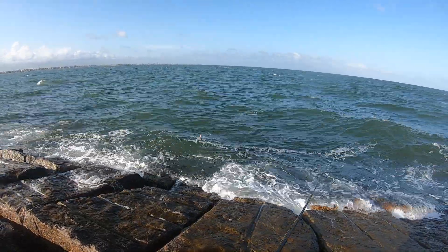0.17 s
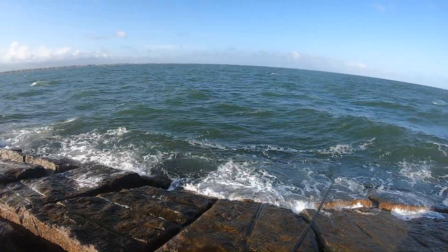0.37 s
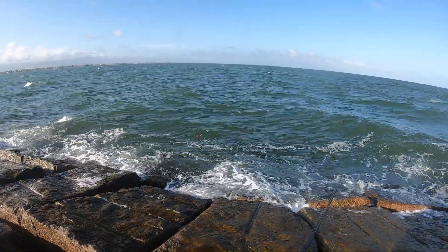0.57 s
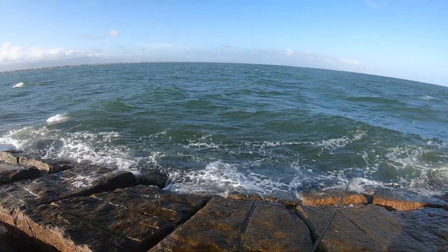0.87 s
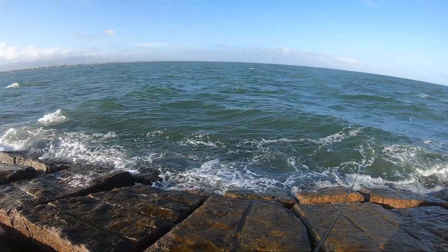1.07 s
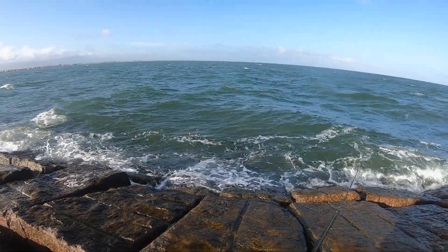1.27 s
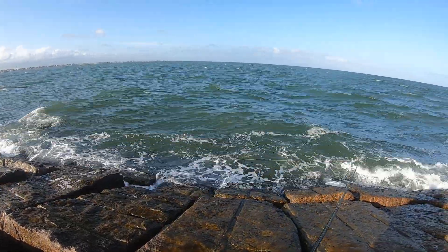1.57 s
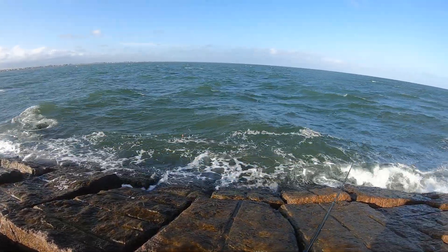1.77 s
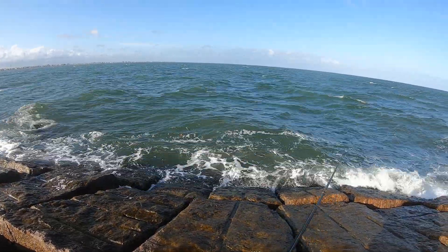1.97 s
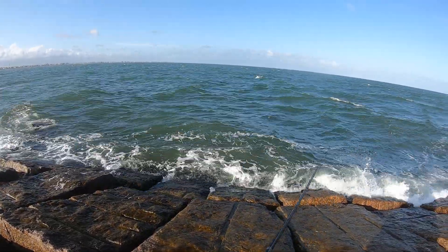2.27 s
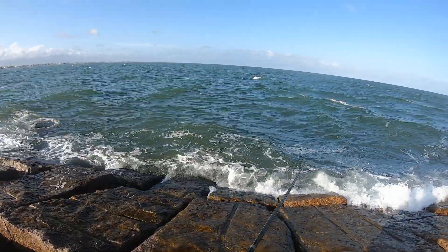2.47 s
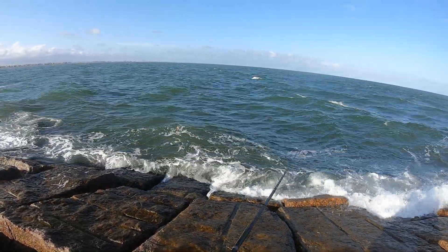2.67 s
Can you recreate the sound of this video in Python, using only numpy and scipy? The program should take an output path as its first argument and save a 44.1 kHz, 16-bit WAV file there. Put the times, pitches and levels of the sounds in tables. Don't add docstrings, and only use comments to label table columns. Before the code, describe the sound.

Surf roars and hisses along a stone jetty, with water slaps, glugs and heavy wind buffeting

```python
import sys
import numpy as np
from scipy import signal
from scipy.fft import rfft, irfft, next_fast_len
from scipy.io import wavfile
from scipy.ndimage import uniform_filter1d, map_coordinates

SR = 44100
rng = np.random.default_rng(int(sys.argv[2]) if len(sys.argv) > 2 else 0)


def unload_audio(sound):
    columns = np.transpose(np.atleast_2d(sound))
    steps = np.round(np.clip(columns, -1, 1) * 32767)
    wavfile.write(sys.argv[1], SR, steps.astype(np.int16))


def invert_db(x):
    u = np.asarray(x, float) / 20
    return 10 ** u


N = 123479


def unit(x):
    return x / np.sqrt(np.mean(x ** 2) + 1e-20)


def curve(rows):
    s, value = np.transpose(rows)
    return np.interp(np.arange(N) / SR, s, value)


def wobble(rate):
    return map_coordinates(rng.standard_normal(999), [np.arange(N) * rate / SR])


def bumps(rows):
    t = np.arange(N) / SR
    return invert_db(sum(db * np.exp(-((t - s) / (length / 2)) ** 2) for s, db, length in rows))


def coloured(x, spectrum):
    size = next_fast_len(N + 8192)
    hz, db = np.transpose(spectrum)
    bins_hz = np.fft.rfftfreq(size, 1 / SR)
    gain = invert_db(np.interp(np.log(bins_hz + 1), np.log(hz + 1), db, left=-120))
    return unit(irfft(rfft(x, size) * gain, size)[:N])


def patchy(depth_db):
    z = signal.stft(rng.standard_normal(N + 512), nperseg=512)[2]
    field = uniform_filter1d(rng.standard_normal(z.shape), size=9, axis=0)
    field = uniform_filter1d(field, size=8, axis=1)
    return signal.istft(z * invert_db(depth_db * unit(field)), nperseg=512)[1][:N]


def grains(count, hz, spread, cycles, scatter_db, size):
    u = rng.random((count, 2))
    pitch_hz = np.clip(hz * np.exp(spread * rng.standard_normal(count)), 100, 15000)[:, None]
    turn = pitch_hz * np.arange(size) / SR
    wave = np.sin(2 * np.pi * turn * (1 + 0.14 * turn / cycles))
    wave = wave * np.exp(-3 * turn / cycles) * (1 - np.exp(-2 * turn))
    wave = wave * invert_db(-scatter_db * np.log(u[:, 1:] + 1 / 20))
    where = (u[:, :1] * N).astype(int) + np.arange(size)
    return unit(np.bincount(where.ravel(), wave.ravel(), N + size)[:N])


def foam(spectrum, fizz, crackle):
    small = grains(count=9000, hz=3494, spread=0.737, cycles=6.4, scatter_db=3.0, size=150)
    sharp = grains(count=3000, hz=7150, spread=0.51, cycles=1.4, scatter_db=5.5, size=40)
    mix = patchy(depth_db=0.8) + fizz * small + crackle * sharp
    return invert_db(0.6 * wobble(19)) * coloured(mix, spectrum)


def breaker():
    # start_s, level_db
    strength = [(0, -49), (.5, -50.5), (.85, -49), (1.07, -47), (1.4, -42.5), (1.75, -45), (1.96, -42.5),
                (2.25, -52), (2.5, -47), (2.8, -53)]
    # pitch_hz, density_db (per Hz)
    foam_colour = [(700, -29), (1300, -11), (1900, -4.5), (3000, -3.5), (5000, -10), (8000, -19),
                   (13000, -24.5), (16000, -30)]
    # pitch_hz, gain_db
    copy_colour = [(1, 0), (3000, 0), (4500, -5), (6500, -4), (8000, 3), (22050, 3)]
    # start_s, lag_ms
    copy_lag = [(0, .535), (1.1, .527), (1.75, .548), (2.3, .537), (2.8, .555)]
    copy_share = 0.7
    direct = foam(foam_colour, fizz=0.42, crackle=0.1)
    copy = np.std(direct) * coloured(direct, copy_colour)
    heard_at = np.arange(N) - curve(copy_lag) * SR / 1000
    late = map_coordinates(copy, [heard_at], order=5, mode="nearest")
    return invert_db(curve(strength)) * unit(direct + copy_share * late)


def wash():
    # start_s, level_db
    strength = [(0, -45), (.35, -45), (.5, -46.5), (.9, -45.5), (1.05, -44.5), (1.3, -43.5), (1.8, -43),
                (2.1, -41), (2.4, -39.5), (2.55, -39), (2.8, -38)]
    # pitch_hz, density_db (per Hz)
    spray_colour = [(600, 0.5), (1300, -10), (1900, -5.5), (2700, -10.5), (4000, -8), (7000, -15),
                    (12000, -23), (16000, -30)]
    return invert_db(curve(strength)) * foam(spray_colour, fizz=0.33, crackle=0.27)


def surges():
    surge_bumps = [(.33, 0.5, .06), (0.832, 1, .04), (1.065, 3.5, .04), (1.25, 1.5, 0.034),
                   (1.343, 2, 0.031), (1.45, 2, 0.047), (1.58, 2, 0.044), (1.965, 2, 0.038),
                   (2.02, -2.5, 0.024), (2.268, -2.5, 0.028), (2.416, 2.5, 0.048), (2.73, 1, .05)]
    return bumps(surge_bumps)


def slaps():
    # start_s, peak_db, pitch_hz (of the trapped air)
    hits = [
        (.4824, -11.5, 640),
        (1.072, -25, 690),
        (1.995, -22, 580),
        (2.254, -25, 550),
    ]
    # pitch_ratio (over the lowest mode), level_db, ring_ratio (over t60_s)
    modes = [(1, 0, .9), (1.6, -3, .6), (2.4, -7, 2), (3.2, -17, .8)]
    t60_s, level_db, splash_db = 0.04, -2, -14
    out, t = np.zeros(N + SR), np.arange(SR // 8) / SR
    onset = 1 - np.exp(-t / 0.00057)
    for s, db, hz in hits:
        ring = sum(invert_db(mode_db - 60 * t / (t60_s * lasts)) * np.sin(2 * np.pi * hz * ratio * t)
                   for ratio, mode_db, lasts in modes)
        dull_noise = np.convolve(rng.standard_normal(len(t)), np.hanning(18) / 6, "same")
        splash = invert_db(splash_db - 60 * t / t60_s) * dull_noise
        out[round(s * SR):][:len(t)] += invert_db(db + level_db) * onset * (ring + splash) / 2
    return out[:N]


def pockets():
    # start_s, level_db, pitch_hz, length_s
    glugs = [(.91, -26.5, 195, 0.045), (1.1, -27.5, 295, 0.048), (1.2, -32, 335, .035),
             (.915, -31, 560, .05), (1.243, -24, 140.5, 0.038), (1.362, -27.5, 277, 0.04),
             (.44, -35, 172, 0.043), (0.56, -27, 180, 0.027), (0.378, -34, 520, 0.042),
             (1.5, -31.5, 170, .035), (1.955, -33, 180, 0.03), (2.065, -31, 154, .035),
             (2.14, -29, 350, 0.032), (1.5, -33, 150, .03), (2.398, -29, 420, 0.034),
             (1.903, -25, 100, 0.052), (2.652, -23, 101, 0.041)]
    # start_s, level_db, pitch_hz, length_s
    flecks = [(1.235, -40, 2000, .03), (1.555, -42, 1800, .035), (2.035, -39, 1900, .025),
              (2.715, -40, 2000, .03)]
    out, t = np.zeros(N + SR), np.arange(SR // 8) / SR
    for s, db, hz, length in [*glugs, *flecks]:
        swell = np.sin(np.pi * np.clip(t / length, 0, 1)) ** 2
        tone = np.sin(2 * np.pi * hz * t * (1 + 0.017 * t / length))
        out[round(s * SR):][:len(t)] += invert_db(db) * swell * tone
    return out[:N]


def drops():
    # start_s, level_db
    ticks = [(.386, -37), (1.075, -33), (1.992, -35), (2.253, -30), (2.408, -26), (2.453, -31)]
    t60_s = 0.014
    out, t = np.zeros(N + SR), np.arange(SR // 20) / SR
    envelope = invert_db(-60 * t / t60_s) * (1 - np.exp(-t / 0.001))
    for s, db in ticks:
        bright_noise = np.gradient(rng.standard_normal(len(t)))
        out[round(s * SR):][:len(t)] += invert_db(db) * envelope * bright_noise
    return uniform_filter1d(out[:N], size=3)


def shore():
    # start_s, level_db
    roar_level = [(0.0, -35.5), (0.18, -33.5), (0.3, -34), (0.33, -32), (0.89, -33), (0.94, -31),
                  (1.23, -31.5), (1.35, -31), (1.84, -33.5), (1.99, -29.5), (2.0, -32.5), (2.22, -30.5),
                  (2.73, -30), (2.8, -31.5)]
    # pitch_hz, density_db (per Hz)
    roar_colour = [(60, -53), (150, -6.5), (300, -2.5), (650, -3.5), (1000, -9.5), (1400, -11.5),
                   (3000, -25), (8000, -49.5)]
    # start_s (centre), gain_db, length_s
    swells = [(.12, 0.5, 0.032), (.47, -2.5, .03), (.6, -2.5, .04), (.86, -1.5, 0.049), (.97, -1, 0.062),
              (1.12, -0.5, 0.037), (1.2, -1, 0.044), (1.37, -0.5, 0.068), (1.52, -3, .04), (1.8, -1, 0.034),
              (2.0, 0.5, 0.035), (2.16, 2.5, 0.029), (2.33, 0.5, 0.044), (2.43, 1, 0.03),
              (2.68, 1.5, 0.036)]
    bubbles = grains(count=1800, hz=457, spread=0.568, cycles=9.4, scatter_db=2.0, size=1500)
    level = invert_db(curve(roar_level) + 0.2 * wobble(14))
    roar = coloured(patchy(depth_db=0.6), roar_colour)
    return level * bumps(swells) * unit(roar + 0.42 * bubbles)


def evened(x, span_s):
    evenness = 0.7
    power = uniform_filter1d(x ** 2, size=round(span_s * SR))
    power = uniform_filter1d(power, size=round(span_s * SR / 2))
    return unit(x / (np.abs(power) + 0.22) ** (evenness / 2))


def wind():
    # start_s, level_db
    push_level = [(0.0, -32.5), (0.1, -27), (0.3, -23), (0.4, -15), (0.6, -21.5), (1.0, -17.5),
                  (1.3, -21.5), (1.55, -19), (1.68, -22), (1.85, -20.5), (2.2, -22), (2.42, -25.5),
                  (2.5, -14), (2.65, -20), (2.8, -21.5)]
    # pitch_hz, density_db (per Hz)
    push_colour = [(1.8, -32), (3, -3), (16, 0), (30, 0), (45, -4), (62, -14), (90, -40), (200, -120)]
    # start_s (centre), gain_db, length_s
    buffets = [(.08, -1, .04), (.14, 5.5, .05), (.22, -6, 0.045), (.32, -6, 0.032), (.44, -4, .04),
               (.54, 4, .06), (.67, 5.5, .045), (.72, -6, 0.035), (.76, 6, 0.029), (.84, -10, 0.043),
               (.88, 3.5, 0.031), (.99, -8, 0.053), (1.08, 8.5, 0.029), (1.14, 0.5, 0.056), (1.2, 3, 0.023),
               (1.33, -4, 0.046), (1.44, -7, .03), (1.48, 3.5, 0.039), (1.52, -5, 0.034), (1.56, 5, 0.05),
               (1.64, 3.5, 0.028), (1.72, -4, 0.044), (1.84, 6.5, .04), (1.92, 1, 0.026), (1.96, -3, .03),
               (2.0, 0, .04), (2.04, -6, 0.033), (2.16, 2.5, .04), (2.26, 0.5, .06), (2.32, 5, 0.027),
               (2.36, 7, 0.051), (2.49, 2.5, 0.062), (2.565, 1, 0.027), (2.68, 3, .03)]
    # start_s, level_db
    flutter_level = [(0, -39), (.2, -34.5), (.9, -32), (1.6, -33), (2.2, -30.5), (2.8, -29)]
    # pitch_hz, density_db (per Hz)
    flutter_colour = [(30, -48), (50, -10.5), (65, -1.5), (90, -1), (130, -11.5), (190, -17.5), (260, -45),
                      (440, -120)]
    # start_s (centre), gain_db, length_s
    thumps = [(.194, 5.5, 0.059), (.267, 5.5, 0.055), (.332, -16, .04), (.388, 2.5, 0.031), (.491, 3, .04),
              (.59, -5, .04), (.649, 6, .04), (.716, 4.5, 0.056), (.76, 2, .03), (.853, 6, .04),
              (.924, 8, 0.032), (.966, -12, .04), (1.082, 3, 0.027), (1.124, 6, .03), (1.207, -1, .03),
              (1.301, 9, .04), (1.397, 1, .04), (1.458, 6, 0.054), (1.579, 6.5, 0.044), (1.78, -7, 0.075),
              (1.84, 6.5, 0.033), (1.917, 11, .04), (2.062, -9, .05), (2.221, 8, 0.028), (2.275, 4.5, .03),
              (2.328, 5, 0.034), (2.42, 0.5, 0.037), (2.455, -7, .04), (2.545, 6.5, .04), (2.6, -5, 0.042),
              (2.666, 8, .04), (2.77, 2.5, 0.056)]
    push = evened(coloured(rng.standard_normal(N), push_colour), span_s=0.045)
    flutter = evened(coloured(rng.standard_normal(N), flutter_colour), span_s=0.022)
    flutter = coloured(flutter, [(1, 5), (200, 1.5), (300, -30)])
    pushed = invert_db(curve(push_level)) * bumps(buffets) * push
    return pushed + invert_db(curve(flutter_level)) * bumps(thumps) * flutter


def scene():
    background = wind() + shore()
    white_water = (breaker() + wash()) * surges()
    return (background + white_water + slaps() + pockets() + drops())[None]


def roll_off(x):
    return signal.sosfilt(signal.butter(12, 15710, fs=SR, output="sos"), x)


def record(dry):
    # pitch_hz, gain_db
    housing = [(1, 0.5), (900, -1), (1300, -5), (1800, 2), (2700, 1), (3300, 0), (14700, 1), (15400, -4)]
    limit, knee = 0.7, 3
    heard = coloured(dry[0], housing)[None] * np.std(dry)
    soft = heard / (1 + np.abs(heard / limit) ** knee) ** (1 / knee)
    return roll_off(soft)


dry = scene()
out = record(dry)
unload_audio(out)
```